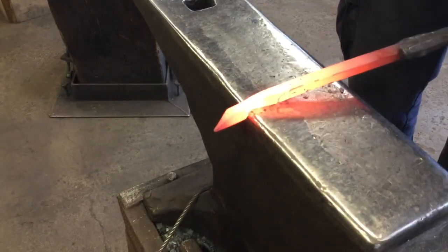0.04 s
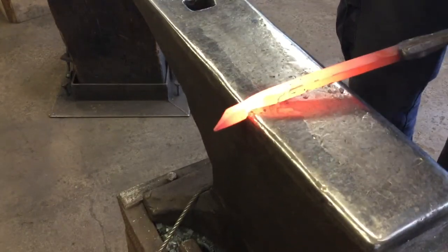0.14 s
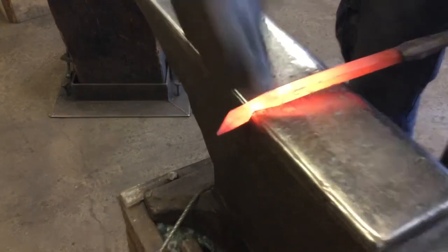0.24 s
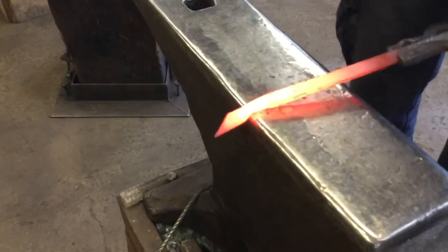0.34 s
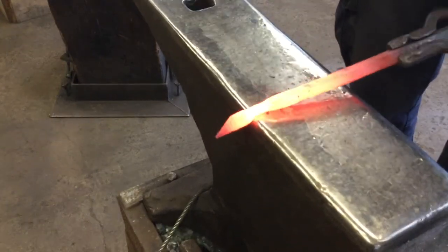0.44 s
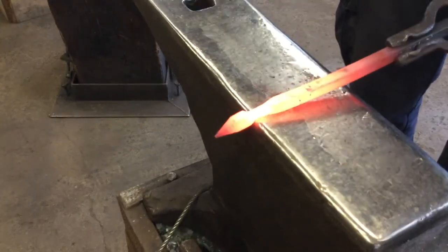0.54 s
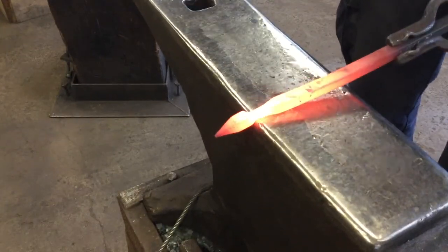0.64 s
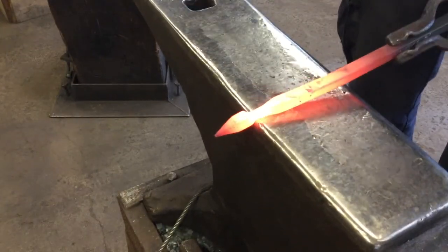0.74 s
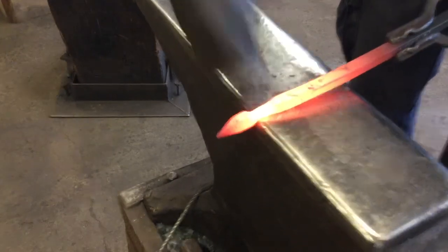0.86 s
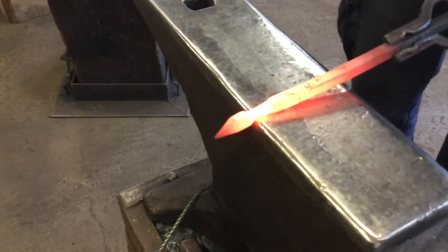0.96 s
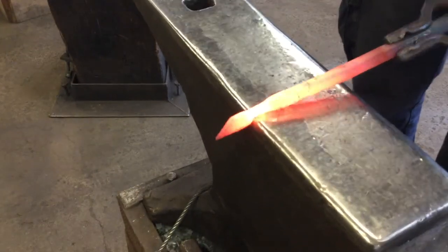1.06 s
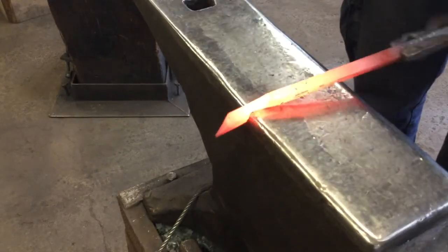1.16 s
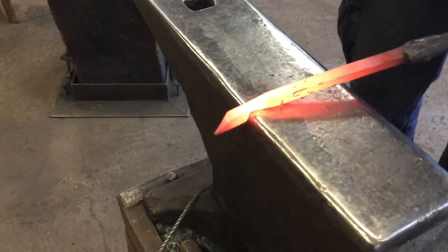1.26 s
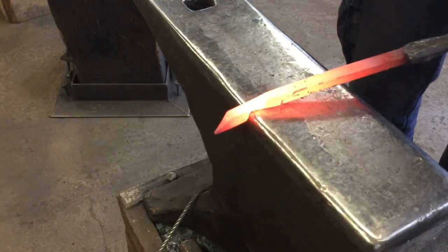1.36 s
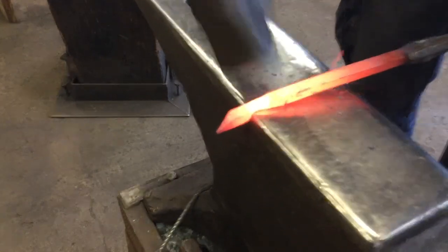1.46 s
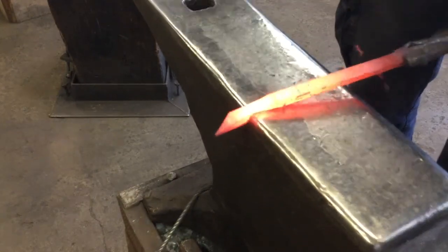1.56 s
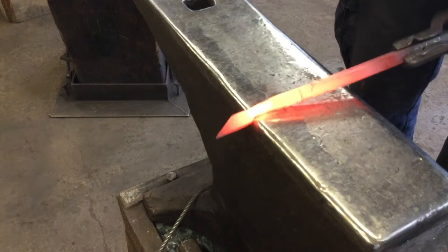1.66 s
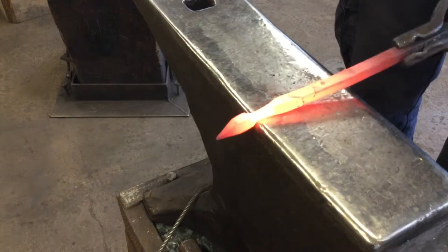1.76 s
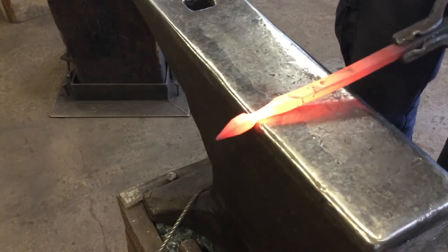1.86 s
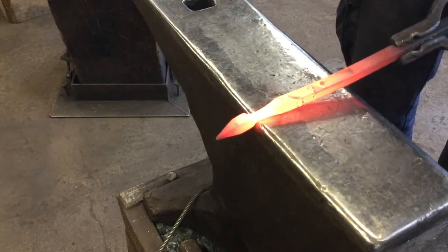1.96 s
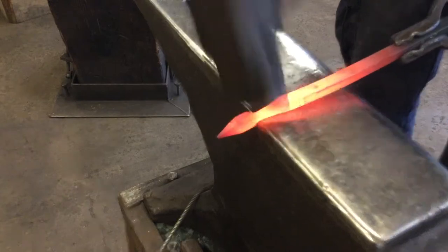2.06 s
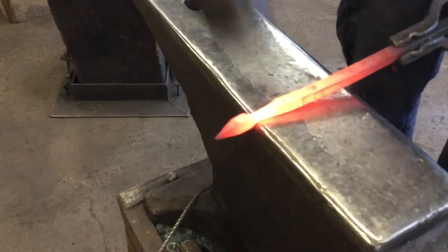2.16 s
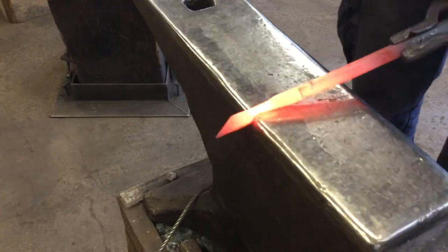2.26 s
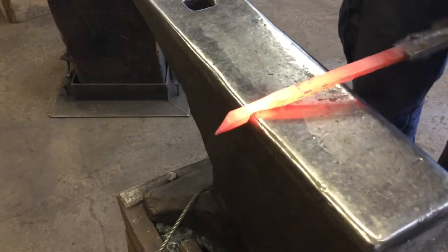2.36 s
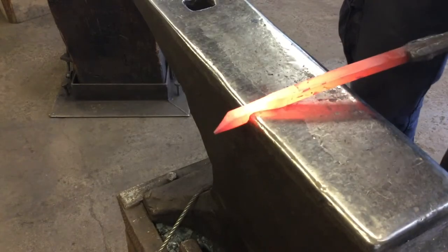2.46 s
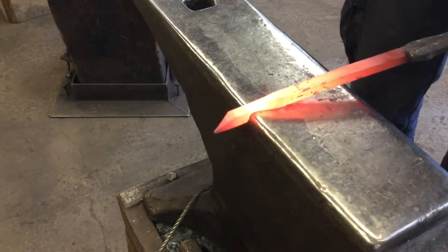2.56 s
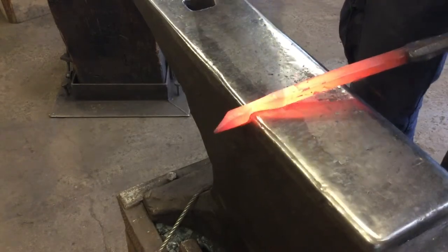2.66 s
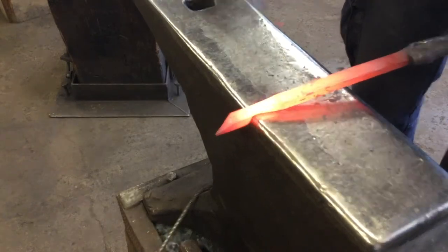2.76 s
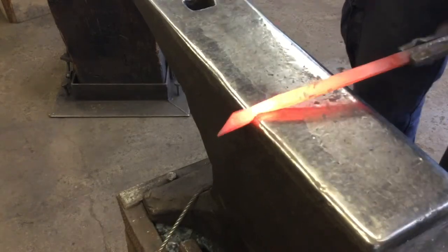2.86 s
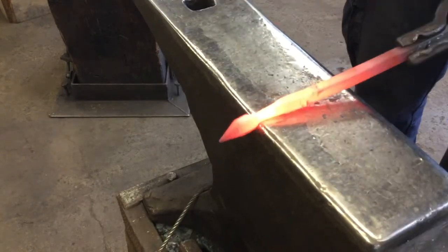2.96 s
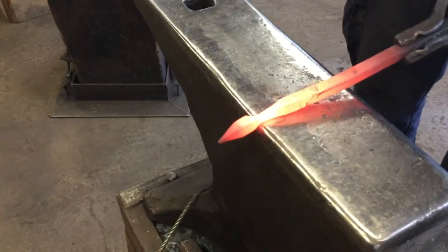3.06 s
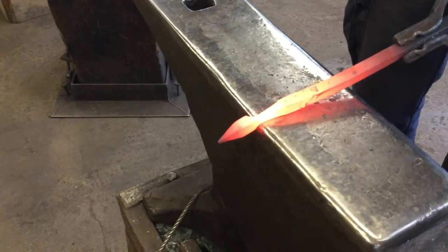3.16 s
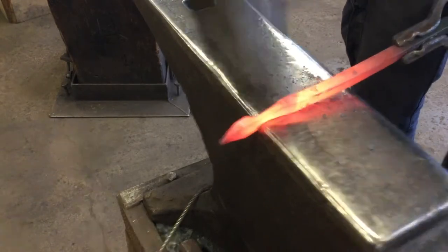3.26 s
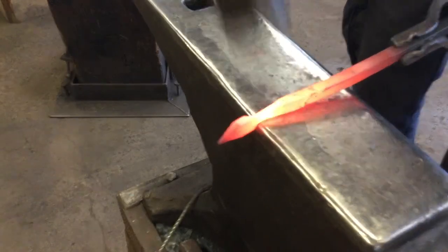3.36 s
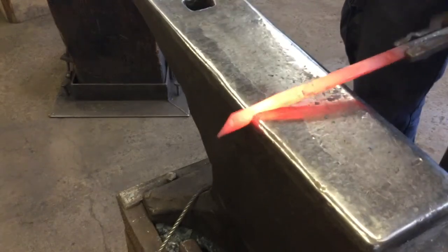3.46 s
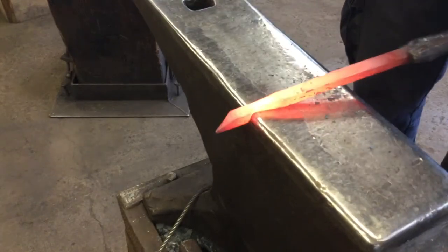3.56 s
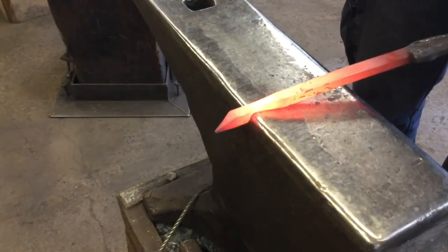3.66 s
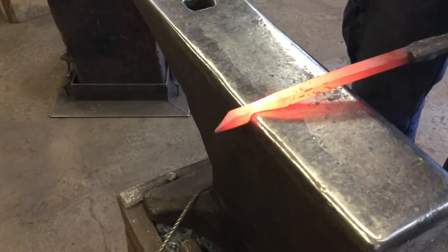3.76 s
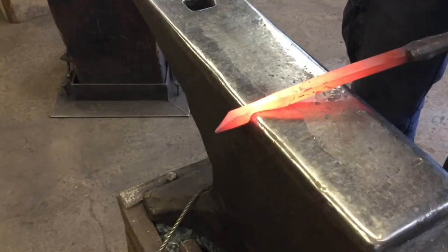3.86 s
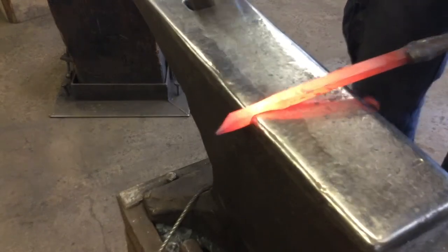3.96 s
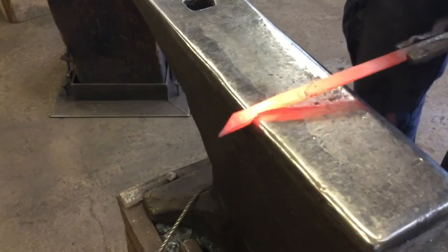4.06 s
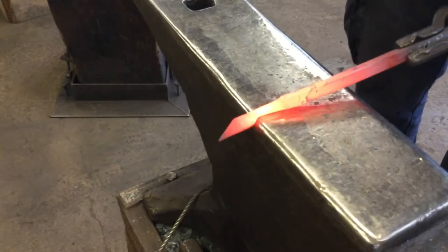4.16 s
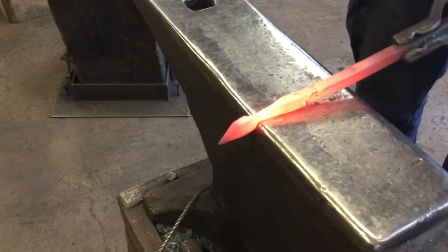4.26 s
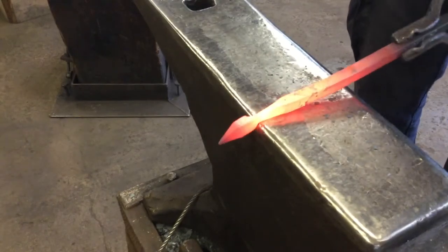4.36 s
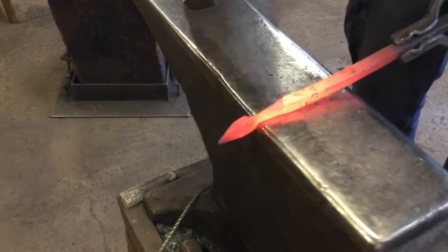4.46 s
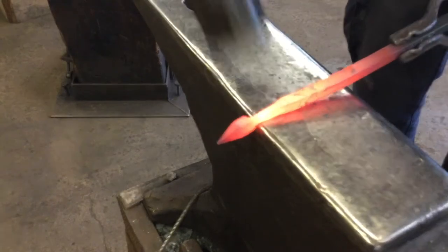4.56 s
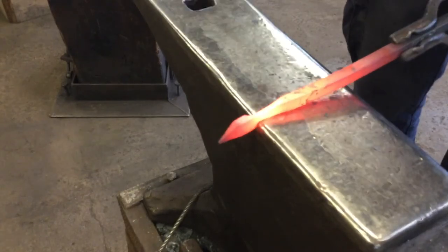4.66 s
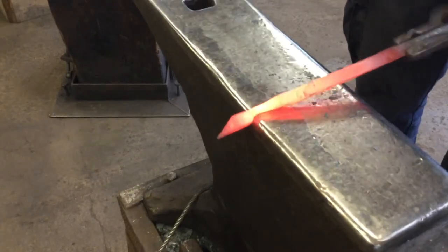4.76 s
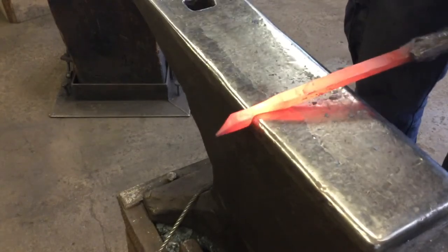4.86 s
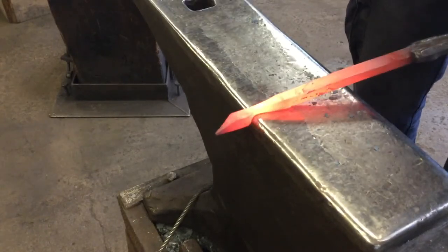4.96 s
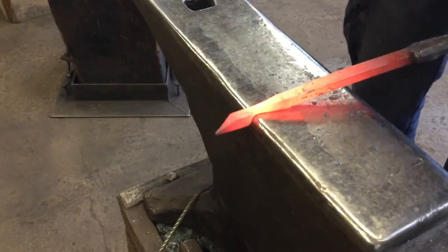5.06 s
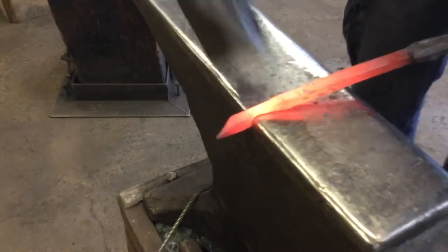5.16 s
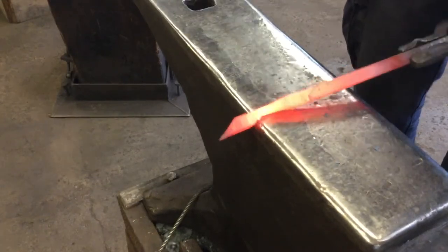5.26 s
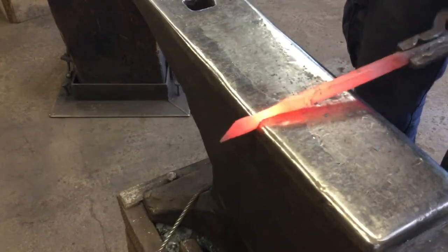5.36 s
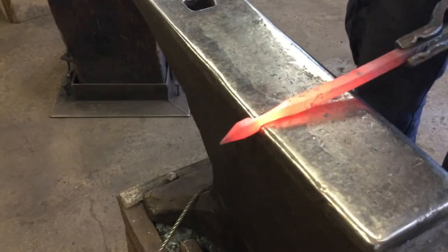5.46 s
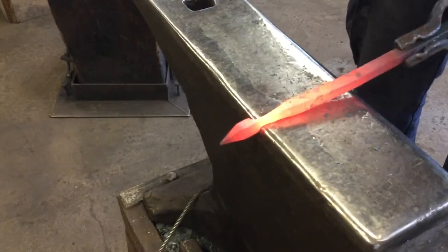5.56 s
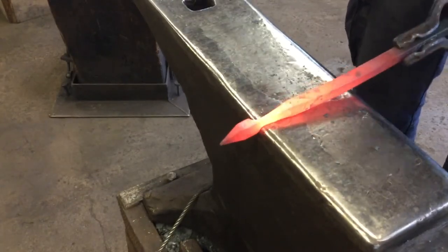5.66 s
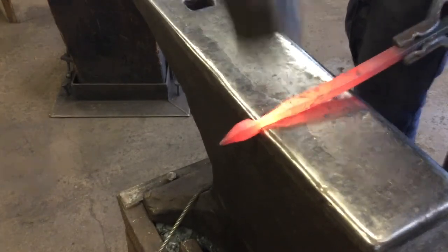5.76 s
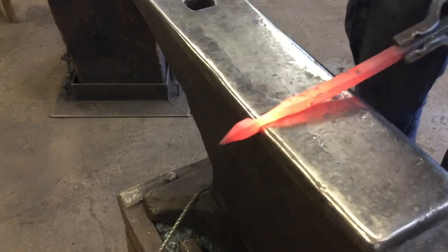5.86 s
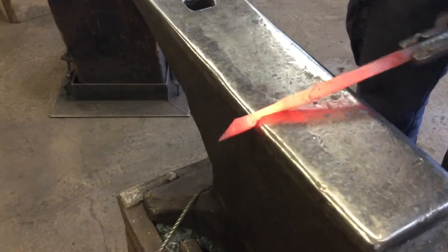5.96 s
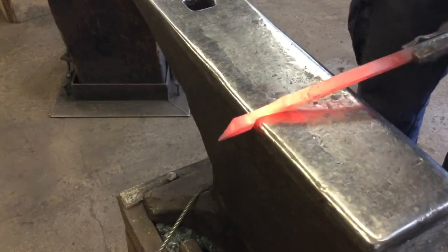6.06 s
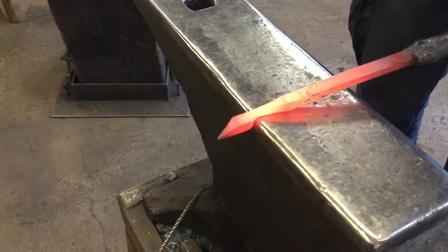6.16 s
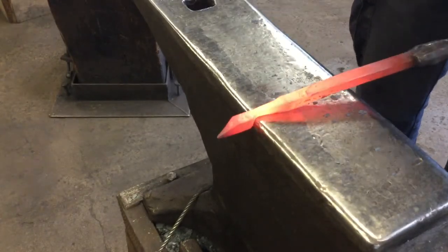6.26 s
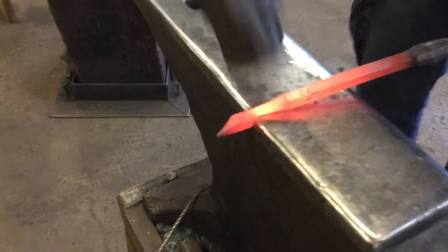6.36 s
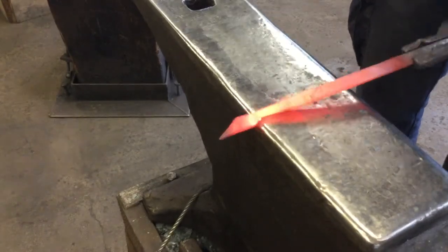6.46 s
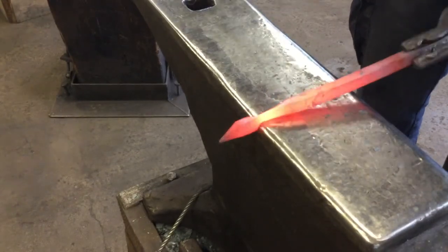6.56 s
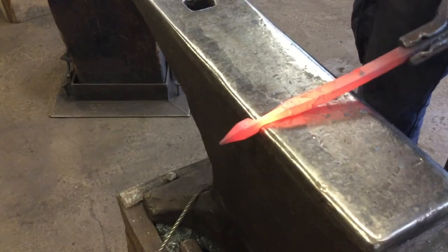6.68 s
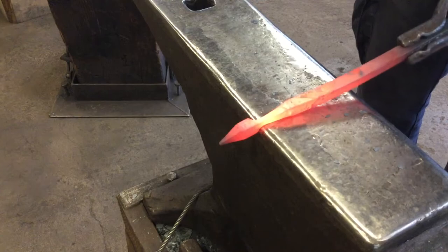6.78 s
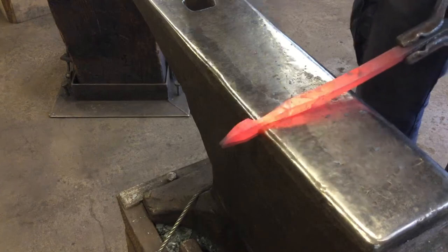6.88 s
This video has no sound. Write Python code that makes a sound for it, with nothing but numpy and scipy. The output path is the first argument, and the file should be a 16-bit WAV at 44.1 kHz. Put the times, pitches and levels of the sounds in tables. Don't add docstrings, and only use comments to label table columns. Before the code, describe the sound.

A faint earlier echo and a low, steady gas-forge roar open the scene in a bare, reverberant workshop. At 0.2 seconds a hand hammer strikes hot steel on an anvil: a bright click, a hard broadband crack and a choked mid-pitched clank, with a heavy thump from the wooden stand. Thin, very high steel ringing shimmers and dies within about a third of a second, while hard walls return short clanging echoes and a faint high whine swells. Further blows follow evenly near 0.8, 1.4, 2.1, 2.7, 3.3, 3.9, 4.5, 5.1, 5.7 and 6.3 seconds. Some are thuddier, as at 0.2 and 4.5; others ring brighter, as at 2.1, 2.7 and 5.7. The microphone is close, flattening the loudest peaks and ducking slightly afterwards. The last tail fades over the low roar until about 6.9 seconds, just as another blow approaches.

```python
import sys
import numpy as np
from scipy import signal
from scipy.fft import rfft, irfft, next_fast_len
from scipy.io import wavfile
from scipy.ndimage import minimum_filter1d

SR = 44100
rng = np.random.default_rng(int(sys.argv[2]) if len(sys.argv) > 2 else 0)


def wav_out(sig):
    wavfile.write(sys.argv[1], SR, np.round(np.clip(np.atleast_2d(sig).T, -1, 1) * 32767).astype(np.int16))


def invert_db(x):
    u = np.asarray(x, float) / 20
    return 10 ** u


N = 305172
EARLIER_BLOW_S = 0.45


def at_hz(points, hz, column=1):
    points = np.array(points)
    return np.interp(np.log(hz), np.log(points[:, 0]), points[:, column])


def in_time(rows):
    return np.interp(np.arange(N) / SR, *np.transpose(rows))


def swell(t, half_s):
    return np.exp(-.5 * (t / half_s) ** 2)


def follows(offset_db, share, db):
    return offset_db + share * db


def coloured(x, gain):
    size = next_fast_len(len(x))
    hz = np.maximum(np.fft.rfftfreq(size, 1 / SR), 10)
    return irfft(rfft(x, size) * gain(hz), size)[:len(x)]


def noise(spectrum):
    x = coloured(rng.standard_normal(N), lambda hz: invert_db(at_hz(spectrum, hz)))
    return x / np.std(x)


def filtered(x, design):
    return signal.sosfilt(design, x)


# t/s, thud level/dB, face ring level/dB, hammer head ring level/dB, high ring level/dB
BLOWS = [(0.213, -8, -27, -18.5, -44), (0.826, -19, -33, -12, -30), (1.447, -15, -30, -17.5, -40),
         (2.054, -24, -42, -10.5, -37), (2.665, -19, -30.5, -11, -38), (3.276, -19.5, -32.5, -12, -37),
         (3.892, -12.5, -35, -17.5, -36), (4.49, -8, -37, -16.5, -34), (5.1, -15.5, -39, -17, -38),
         (5.695, -17, -33, -11, -26), (6.32, -11.5, -34, -20.5, -35)]
BLOW_S = np.array(BLOWS)[:, 0]


def strikes(levels_db):
    clicks = np.full(N, 1e-18)
    clicks[[round((s + .0003) * SR) for s in BLOW_S]] = invert_db(levels_db)
    return clicks


def returned(blow_db, response):
    lead = round(EARLIER_BLOW_S * SR)
    clicks = np.concatenate([[invert_db(blow_db[0])], np.zeros(lead - 1), strikes(blow_db)])
    return signal.fftconvolve(clicks, response)[lead:lead + N]


def fading(clicks, t60):
    return signal.lfilter([1], [1, -invert_db(-60 / (t60 * SR))], clicks)


def ring(clicks, hz, t60):
    r, w = invert_db(-60 / (t60 * SR)), 2 * np.pi * hz / SR
    return signal.lfilter([0, np.sin(w)], [1, -2 * r * np.cos(w), r * r], clicks)


def struck(modes, levels_db, spread_db=0):
    luck = spread_db * rng.standard_normal((len(BLOWS), len(modes)))
    total = 0
    for k, (hz, db, t60) in enumerate(modes):
        total = total + ring(strikes(levels_db + db + luck[:, k]), hz, t60)
    return total


# f/Hz, level/dB (per Hz)
FORGE = [(15, -52), (25, -30), (48, -10.5), (146, -4), (200, -8.5), (223, -18.5), (353, -15.5),
         (427, -27.5), (474, -33), (802, -38.5), (2710, -52), (3800, -54), (4940, -103), (8360, -120)]
# f/Hz, level/dB (per Hz)
HISS = [(2650, -45), (4500, -4), (5000, -3), (6400, -7), (7790, -9), (8420, -0.5), (10300, -8), (12200, -9),
        (13600, -7), (14400, -3)]
# t/s, level/dB
ROAR = [
    (0.0, 1),
    (6.92, 0.5),
]


def forge():
    return invert_db(in_time(ROAR)) * (invert_db(-23) * noise(FORGE) + invert_db(-56) * noise(HISS))


# f/Hz, return level/dB, T60/s
SHOP = [(204, 6, 0.38), (455, -10.5, 1.32), (973, -19.5, 1.39), (1627, -7.5, 1.2), (2210, -23, 1.27),
        (3660, -23, 1.016), (6860, -32, 0.73), (9600, -24, 0.6), (12100, -18.5, 0.073), (15000, -49, 0.2)]


def workshop():
    t = np.arange(int(1.2 * SR)) / SR
    white = rng.standard_normal((2, len(t)))
    edges = 140 * 2 ** np.arange(0, 7.1, .5)
    tail = 0
    for k, (low, high) in enumerate(zip(edges, edges[1:])):
        band = filtered(white[k % 2], signal.butter(2, [low, high], "band", fs=SR, output="sos"))
        hz = np.sqrt(low * high)
        tail = tail + band * invert_db(at_hz(SHOP, hz) - 60 * t / at_hz(SHOP, hz, column=2))
    return tail * (1 - np.exp(-t / 0.00095))


# f/Hz, level/dB, T60/s
BLOOM = [(1845, -43, .08), (2060, -48, .08), (3152, -44, .12), (4360, -50, .06)]


def room(blow_db, rings):
    shop = workshop()
    bloom = sum(invert_db(db) * ring(shop, hz, t60) for hz, db, t60 in BLOOM)
    return returned(blow_db, shop + bloom) + invert_db(-40) * signal.fftconvolve(rings, shop)[:N]


def slap(blow_db):
    burst = rng.standard_normal(N) * fading(strikes(blow_db - 6), .015)
    dull = filtered(burst, signal.butter(2, (1100, 1900), "band", fs=SR, output="sos"))
    return np.roll(dull, round(.062 * SR))


# level/dB, t/s (swell after the blow)
HORN = [(-54.5, 0.42), (-56, 0.3), (-51.5, 0.22), (-58, 0.26), (-50, 0.18), (-59.5, 0.21), (-50, .36),
        (-50, 0.35), (-52.5, 0.18), (-48.5, 0.43), (-47.5, 0.051), (-52, 0.35)]


def horn():
    horn_hz, flutter_hz, flutter = 4187, 9, .55
    t = np.arange(N) / SR
    starts = np.concatenate([[-EARLIER_BLOW_S], BLOW_S])
    last = np.searchsorted(starts, t, side="right") - 1
    level_db, peak_s = np.transpose(HORN)[:, last]
    since = t - starts[last]
    between = invert_db(-7 - 60 * since / 12)
    envelope = invert_db(level_db) * (swell(since - peak_s, 0.07) + between)
    neighbour = ring(rng.standard_normal(N), horn_hz + flutter_hz, 0.38)
    return envelope * (np.sin(2 * np.pi * horn_hz * t) + flutter * neighbour / np.std(neighbour))


# f/Hz, level/dB, T60/s
STAND = [(79.5, -2, 0.038), (113, 7.5, 0.038), (200, 1, 0.065)]
# f/Hz, level/dB, T60/s
KNOCK = [(342, 0, .07)]


def thud(thud_db):
    stand = struck(STAND, thud_db + 3.5, spread_db=6.5)
    return np.roll(stand, round(0.00254 * SR)) + struck(KNOCK, follows(4.5, 0.59, thud_db))


ANVIL_HZ = [1838, 1858, 3527, 4900, 6485, 12300, 13640, 14720, 15300]
# level/dB, T60/s
ANVIL = [(-38, .7), (-12, .07), (-28, .06), (-29, .12), (-25, .08), (-28, .07), (-42, .2), (-30, .08),
         (-30, .07)]
# f/Hz, level/dB, T60/s
WAIST = [(3150, 2, .09), (3156, -5, .9), (3148, -11, .8)]
WAIST_DB = [-31, -47, -32, -33.5, -34, -33.5, -44, -37, -34.5, -34, -29.5]
# f/Hz, level/dB, T60/s
EDGE = [(4350, 0, .06), (4363, -29, .5), (4335, -29, .45), (4390, -30, .4)]
# f/Hz, level/dB, T60/s
HEEL = [(5466, -3, .3)]
# f/Hz, level/dB, T60/s
FACE = [(6874, 0, .33)]
# f/Hz, level/dB, T60/s
HIGH = [(12952, 1, .75), (12950, -12, .15)]


def anvil(blow_db, thud_db, face_db, head_db, high_db):
    body = struck([(hz, *mode) for hz, mode in zip(ANVIL_HZ, ANVIL)], blow_db, spread_db=2.5)
    waist = struck(WAIST, np.array(WAIST_DB))
    edge = struck(EDGE, follows(0.23, 0.72, head_db))
    heel = struck(HEEL, follows(-45, -0.93, thud_db))
    return body + waist + edge + heel + struck(FACE, face_db + 7) + struck(HIGH, high_db - 3.5)


# f/Hz, level/dB, T60/s
HEAD = [(10995, -16, .25), (10960, -21, .3), (11398, 0, .27), (11421, -21, .35), (11370, -20, .3)]


def hammer_head(head_db):
    return struck(HEAD, head_db - 1)


# t/s (after the blow), level/dB, half length/s
ECHOES = [
    (.058, -27, .011),
    (.113, -31, .012),
    (.15, -34, .014),
    (.235, -28, .05),
    (.3, -37, .012),
    (.375, -34, .016),
    (.42, -35, .02),
    (.52, -46, .07),
]
ECHO_HZ = [1464, 1476, 1480, 1468, 1468, 1468, 1468, 1468]


def clang(blow_db):
    t = np.arange(SR) / SR
    luck = 1.5 * rng.standard_normal((len(BLOWS), len(ECHOES)))
    echoes = 0
    for k, (s, level_db, half_s) in enumerate(ECHOES):
        echo = swell(t - s, half_s) * np.sin(2 * np.pi * ECHO_HZ[k] * t)
        echoes = echoes + returned(blow_db + level_db + luck[:, k], echo)
    choke = swell(t, .021)
    flare = invert_db(-60 * t / 0.26) * choke * np.sin(2 * np.pi * 1474 * t)
    return returned(blow_db + 3.55, flare) + echoes


# f/Hz, level/dB (per Hz)
CRACK = [(120, -51), (300, 4), (800, -5), (1500, -4.5), (3000, -7), (6000, -12.5), (10000, -18),
         (15000, -87)]


def crack(blow_db):
    return invert_db(-2.5) * noise(CRACK) * fading(strikes(blow_db), 0.056)


def tick(blow_db):
    bright = filtered(rng.standard_normal(N), signal.butter(4, 8000, "high", fs=SR, output="sos"))
    return invert_db(-2.5) * bright * np.roll(fading(strikes(blow_db), 0.0048), -round(.0002 * SR))


def scene():
    thud_db, face_db, head_db, high_db = np.transpose(BLOWS)[1:]
    blow_db = follows(1.74, 0.19, head_db)
    rings = anvil(blow_db, thud_db, face_db, head_db, high_db) + hammer_head(head_db)
    background = forge() + room(blow_db, rings) + slap(blow_db) + horn()
    blow = thud(thud_db) + rings + clang(blow_db) + crack(blow_db) + tick(blow_db)
    return (background + blow)[None]


def clip(x, top):
    return x / (1 + np.abs(x / top) ** 6) ** (1 / 6)


def spill():
    next_blow_s = 6.920
    until = np.append(BLOW_S, next_blow_s)[:, None] - np.arange(N) / SR
    near = (until > 0) & (until < .03)
    ahead = np.where(near, np.exp(-np.abs(until) / 0.0065), 0).sum(axis=0)
    dull = signal.cheby2(8, 40, 9300, fs=SR, output="sos")
    return invert_db(-21) * filtered(noise(CRACK), dull) * ahead


# f/Hz, level/dB
FAINT = [(9000, -99), (10200, -94.5), (13300, -94), (13800, -88), (14200, -80), (16000, -76)]


def masked(x):
    size, width = 2048, 8
    hz, s, cells = signal.stft(x, SR, nperseg=size)
    bins = (np.abs(cells[:-1]) ** 2).reshape(-1, width, cells.shape[1])
    power = bins.mean(axis=1)
    tone = bins.max(axis=1) > invert_db(2 * 7) * np.median(bins, axis=1)
    centre = hz[:-1].reshape(-1, width).mean(axis=1)[:, None]
    loudest = -minimum_filter1d(-power, size=15, axis=0)
    below = np.roll(loudest, 8, axis=0)
    weak = power < loudest * invert_db(2 * -25)
    spared = tone & ~weak & (power > 4 * np.roll(power, -2, axis=0))
    hidden = (centre > 6500) & weak
    hidden |= (centre > 11600) & (power < below * invert_db(2 * -17)) & ~spared
    hidden &= np.abs(s - BLOW_S[:, None]).min(axis=0) > .023
    faint = (centre > FAINT[0][0]) & (power < invert_db(2 * at_hz(FAINT, centre)))
    cells[:-1] *= np.repeat(~(hidden | faint), width, axis=0)
    return signal.istft(cells, SR, nperseg=size)[1][:N]


def low_pass(x):
    return signal.sosfilt(signal.butter(12, 16650, fs=SR, output="sos"), x)


def record(dry):
    since = np.arange(N) / SR - BLOW_S[:, None] - .04
    dip = np.where(since > 0, np.exp(-np.abs(since) / 0.54), 0).max(axis=0)
    x = filtered(dry[0] * invert_db(-3 * dip), signal.butter(2, 35, "high", fs=SR, output="sos"))
    x = clip(x, .72)
    x = signal.sosfiltfilt(signal.butter(2, 36, "high", fs=SR, output="sos"), x)
    x = masked(clip(x + spill(), .82))
    x = filtered(x, signal.cheby2(12, 60, 16600, fs=SR, output="sos"))
    return low_pass(x[None])


dry = scene()
out = record(dry)
wav_out(out)
```